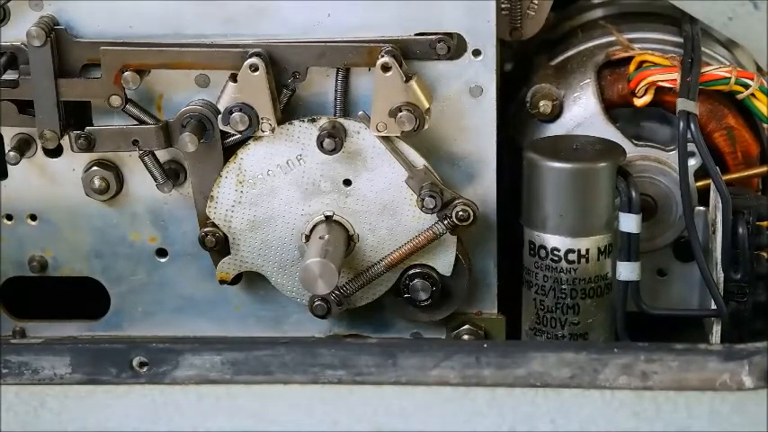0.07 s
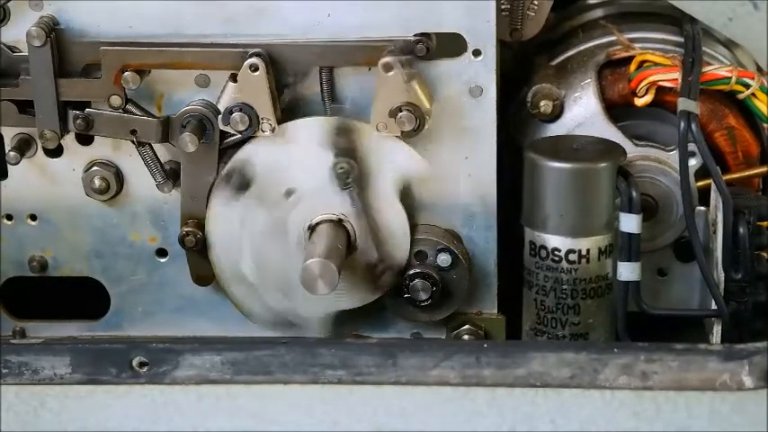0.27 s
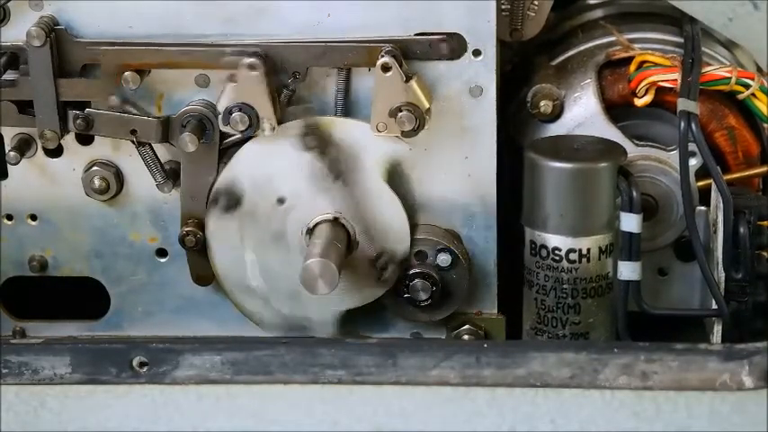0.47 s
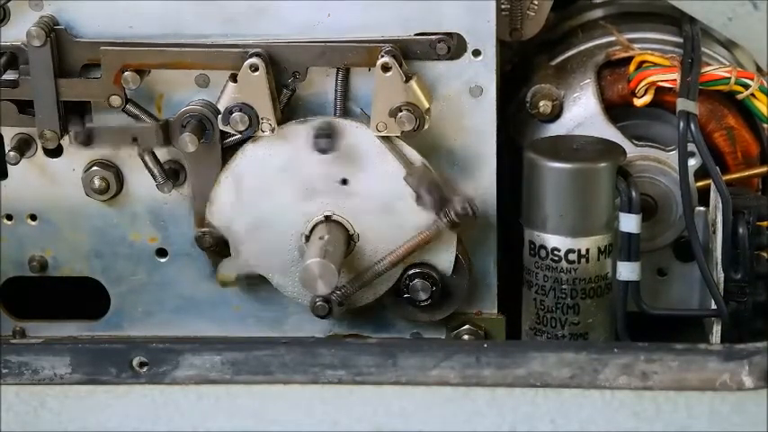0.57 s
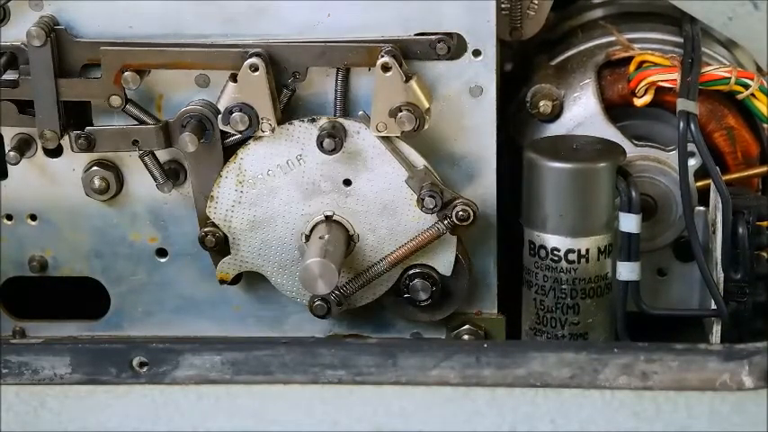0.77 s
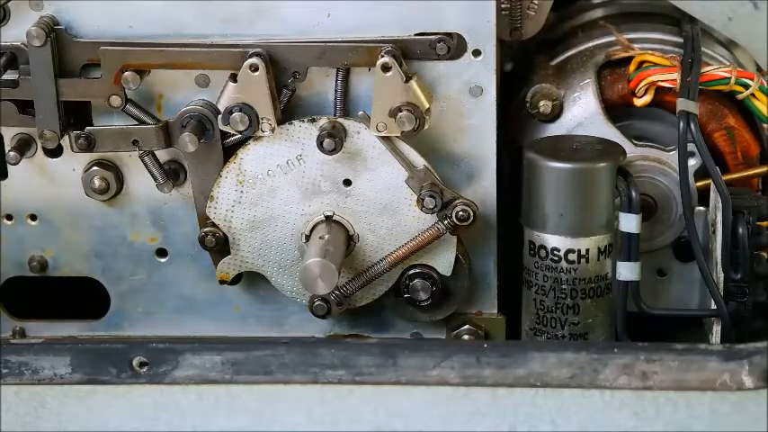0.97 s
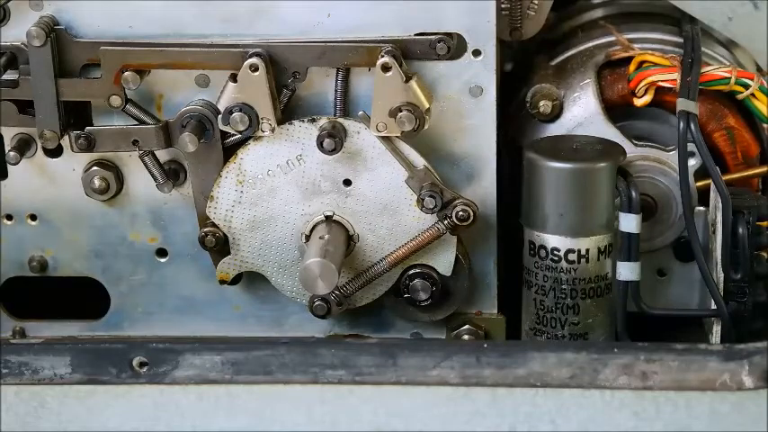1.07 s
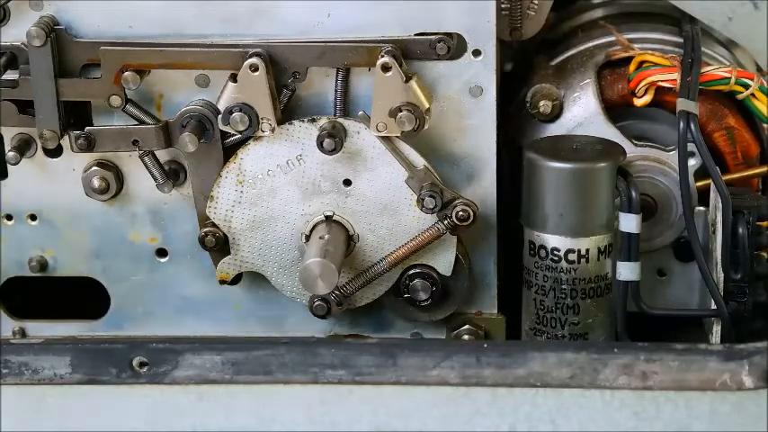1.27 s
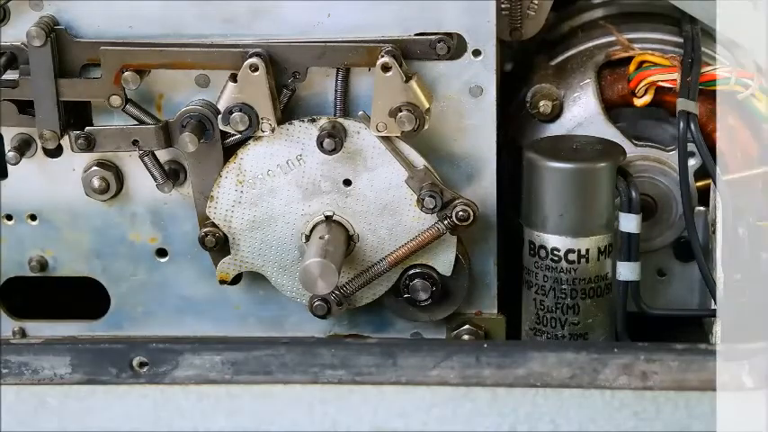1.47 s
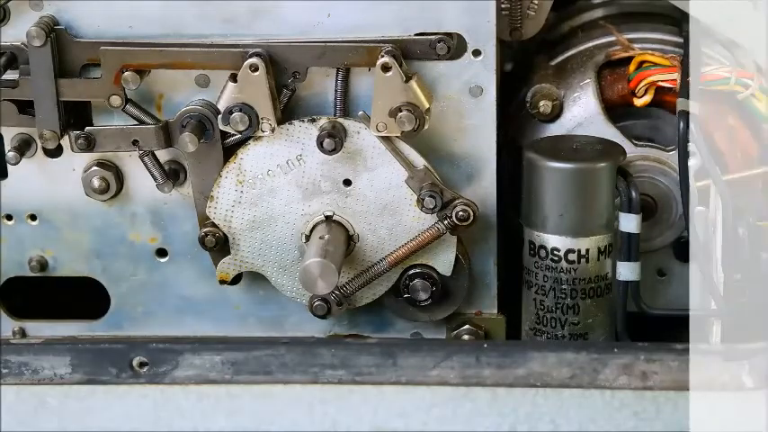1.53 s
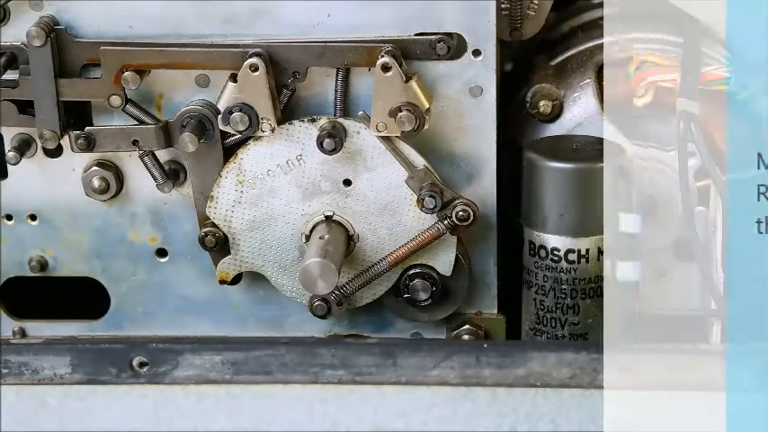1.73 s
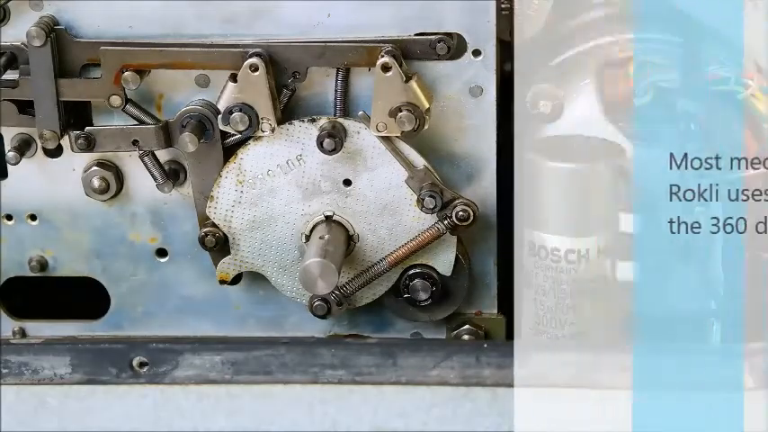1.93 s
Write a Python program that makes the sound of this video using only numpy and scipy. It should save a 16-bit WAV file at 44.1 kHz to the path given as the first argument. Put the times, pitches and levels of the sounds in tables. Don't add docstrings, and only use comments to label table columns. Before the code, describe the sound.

A motor-driven calculating mechanism clicks on, rattles harshly in two quick bursts of steel blows, stops abruptly, then only quiet room air, tiny settling ticks and a faint low thud remain, heard very close in a small room.

```python
import sys
import numpy as np
from scipy import signal
from scipy.fft import rfft, irfft, next_fast_len
from scipy.io import wavfile
from scipy.ndimage import uniform_filter1d, map_coordinates

SR = 44100
rng = np.random.default_rng(int(sys.argv[2]) if len(sys.argv) > 2 else 0)


def to_linear_factor(level_db):
    exponent = np.asarray(level_db, float) / 20
    return 10 ** exponent


def int16_out(signal):
    q = np.round(np.clip(np.atleast_2d(signal).T, -1, 1) * 32767)
    wavfile.write(sys.argv[1], SR, q.astype(np.int16))


N = 88200

# (time [s], peak level [dB], brightest pitch [Hz], decay time t60 [s])
LEVER_BLOWS = [(.1982, -6.5, 11080, 0.012), (0.2026, -7, 5490, 0.014), (0.2088, -3, 11100, 0.02),
               (0.2176, -7, 12030, 0.014), (0.2612, -13.5, 10250, .012), (.2705, -13, 12000, .02),
               (.2730, -7.5, 12140, .02), (.2750, -4, 6470, 0.023), (.2790, -1.5, 5486, 0.022),
               (0.289, -7, 5010, 0.011), (0.301, -12, 8000, 0.013), (.3060, -9, 3810, 0.015),
               (0.3144, 1.5, 12560, .008), (.3210, -4, 7990, 0.021), (0.3257, -7, 9030, .01),
               (0.3283, -3, 12500, 0.01), (0.3306, 2, 13100, 0.014), (0.339, -7.5, 13950, 0.011),
               (0.3446, 2, 6860, 0.0092), (0.3517, -9, 7510, .014), (0.3718, -10, 10990, .008),
               (0.3794, -3, 3960, .01), (0.3855, -7.5, 4506, .01), (0.39, -9, 6497, 0.012),
               (.4000, -7, 8960, .01), (0.4055, 3.5, 12240, 0.013), (0.4133, 3, 4314, 0.0091),
               (.4230, -7.5, 8285, 0.0088), (.5006, -5, 2401, 0.014), (.5105, -12.5, 2200, 0.019),
               (0.517, -11, 7000, .014), (0.5196, -5, 7350, 0.011), (0.5249, 1, 11270, 0.015),
               (0.5287, -6.5, 4000, 0.0077), (.5340, -7.5, 11040, 0.017), (0.538, -8.5, 7470, .01),
               (0.5436, 5.5, 4295, 0.0087), (0.552, -7, 7060, 0.0097), (0.56, -9, 4494, 0.0054),
               (0.5809, -5, 3185, .011), (0.6071, -10.5, 5990, 0.009), (.6140, 3.5, 4052, .011),
               (0.6227, -7.5, 4003, 0.009), (.6300, -2.5, 12500, 0.019), (0.6374, -7.5, 6500, .02),
               (0.6546, 0, 7000, 0.0091), (.6580, -0.5, 11950, 0.014), (0.6654, -11, 3003, 0.017)]
BLOW_RISE_S, BLOW_Q, BLOW_TUNED_DB, BLOW_TRIM_DB = 0.0004, 1.9, 9.5, -9
# (frequency [Hz], level [dB], t60 [s])
STEEL_MODES = [(1610, -16, 0.037), (2081, -16, 0.059), (3077, -2, 0.052), (4028, -3.5, 0.079),
               (4610, -11.5, 0.069), (6770, -4.5, 0.038), (7350, -6, 0.061), (11890, -10.5, .03),
               (13450, -7.5, 0.044)]
STEEL_DB = -22.5

# (time [s], peak level [dB])
PLATE_THUMPS = [(0.206, -31.5), (0.262, -21.5), (0.274, -19), (0.284, -14.5), (0.299, -22), (0.329, -24),
                (0.376, -25), (0.407, -23), (0.503, -20), (0.512, -17), (0.5285, -11.5), (0.543, -28.5),
                (0.582, -24), (0.601, -18.5), (0.631, -24.5), (0.666, -20)]
# (frequency [Hz], level [dB], t60 [s])
PLATE_MODES = [(689.4, 1, .05), (736, 1, 0.057), (773.6, -1.5, 0.045), (839.6, -3, 0.11), (1108, -3, 0.073),
               (1225, -7, 0.089), (1480, -9.5, 0.076)]
PLATE_TRIM_DB = -6
# (frequency [Hz], level [dB], t60 [s])
STOP_BLOW_MODES = [(845, -2.5, 0.17), (1109, -6.5, 0.18), (1186, -4, .08), (1329, -11, 0.35),
                   (705, -3.5, 0.11)]
STOP_BLOW_S, STOP_BLOW_DB = 0.664, -24

# (time [s], level [dB])
GEAR_EFFORT = [(.195, -73.5), (.199, -30), (.23, -20), (.266, -22.5), (.274, -16), (.30, -13),
               (.335, -20.5), (.36, -19.5), (.43, -20), (.495, -34.5), (.52, -10.5), (.54, -13),
               (.575, -23), (.62, -17), (.64, -16), (.675, -18), (.70, -33), (.74, -70.5)]
TEETH_PER_S, TOOTH_SPREAD_DB, TOOTH_T60_S = 2600, 1.6, 0.004
# (frequency [Hz], density [dB per Hz])
CLATTER_SPECTRUM = [(100, -63), (300, -34), (600, -20.5), (700, -8.5), (1790, -11.5), (3300, -6.5),
                    (9070, -8), (12500, -6.5)]
# (time [s], level [dB])
MOTOR_LEVEL = [(.2, -75), (.28, -43.5), (.4, -51), (.5, -52), (.56, -58), (.62, -69.5), (.69, -53.5),
               (.84, -54.5), (.92, -78)]
# (frequency [Hz], width [Hz], level [dB])
MOTOR_HUM = [(127.2, 43, -1), (144.7, 18, -8), (65, 13, -6.5)]

# (time [s], peak level [dB])
CASE_KNOCKS = [
    (.276, -34),
    (0.332, -37),
    (.407, -36.5),
    (0.527, -43),
]
# (frequency [Hz], level [dB], t60 [s])
CASE_MODES = [(122, -2.5, 0.099), (222, -4.5, 0.13), (339.6, -3, 0.066)]
# (time [s], peak level [dB])
BASE_JOLTS = [(.197, -38), (.225, -39.5), (.258, -36), (.273, -29.5), (.311, -30), (.404, -29.5),
              (.501, -38), (.518, -35), (.53, -36), (.632, -38), (.695, -39.5), (.805, -46)]
# (frequency [Hz], level [dB], t60 [s])
BASE_MODES = [(250, -4.5, 0.031), (338, -2, .06), (430.7, -2, 0.044), (510.7, -3.5, 0.056)]

# (time [s], peak level [dB])
RELAY_TICKS = [
    (0.1245, -21.5),
    (0.1262, -27),
    (0.1331, -28),
]
# (frequency [Hz], level [dB], t60 [s])
RELAY_MODES = [(2891, -13, 0.18), (3800, -8, 0.12), (4030, -3.5, 0.13), (4790, -14, .15), (6600, -10, 0.18),
               (7400, -2, .25), (7750, -3, .2), (8350, -4, .04), (10400, -7, .1), (12900, -9, .2),
               (13890, -9, .2)]
# (time [s], peak level [dB], pitch [Hz], sharpness Q [-])
SETTLING_TICKS = [
    (1.0785, -43, 2500, 1.2),
    (1.094, -51, 10000, 1.2),
    (1.1565, -33.5, 11000, .8),
    (1.172, -48, 2600, 2),
    (1.21, -52, 300, 1.5),
    (1.245, -50, 350, 1.5),
    (1.275, -50, 300, 1.5),
    (1.528, -59, 4200, 2.2),
    (1.7092, -48.5, 4050, 9),
]
# (frequency [Hz], level [dB], t60 [s])
THUD_MODES = [(149.3, -6, 0.2), (250, 0, 0.13), (352.3, -5.5, 0.16), (413.7, 1.5, 0.079), (682, -5, 0.1),
              (801, -0.5, 0.05)]
THUD_S, THUD_DB = 1.8962, -44.5

# (frequency [Hz], louder left and quieter right [dB])
LEFT_TILT = [(100, .5), (1300, 1.07), (2400, 0.23), (15000, 0)]
OPEN_HZ = 540
DEAD_HZ, DEAD_WIDTH_HZ, DEAD_DEPTH = 974, 170, 0.41
# (frequency [Hz], side over mid amplitude [-])
STEREO_WIDTH = [(400, .3), (750, .15), (1500, 0.57), (2400, 0.26), (4400, .8), (13000, 0.91)]

# (frequency [Hz], t60 [s])
ROOM_T60 = [(150, .4), (800, .75), (1300, 0.88), (4000, 0.66), (8000, 0.56), (12000, .5), (15000, .4)]
ROOM_DB = -6.5

# (time [s], level [dB])
BACKGROUND_LEVEL = [(0, -56.5), (.18, -57), (.3, -45), (.53, -52.5), (.59, -72.5), (.7, -64), (.9, -48.5),
                    (1.1, -53), (1.3, -54.5), (1.55, -63.5), (1.7, -68.5), (1.78, -59), (1.9, -54.5),
                    (2, -57)]
# (frequency [Hz], density [dB per Hz])
AIR_SPECTRUM = [(15, -34), (30, -3.5), (148, -7.5), (400, -7), (926, -14.5), (3000, -19.5), (9000, -24),
                (15000, -24.5)]
# (frequency [Hz], left-right likeness [-])
AIR_LIKENESS = [(60, 0.55), (380, 0.46), (2380, 0.11), (15000, 0.13)]
# (frequency [Hz], width [Hz], level [dB])
FIRST_HUM = [(275.1, 16, -3), (480, 8.3, -5.5), (144, 14, -7)]
# (frequency [Hz], width [Hz], level [dB])
SECOND_HUM = [(1221, 109, -8.5), (833, 52, -17.5), (290.8, 53, -7.5)]
CHANGE_S, FLUTTER_DB, FLUTTER_PER_S = 1.737, 2, 35
# (time [s], gain [dB])
ROOM_DIP = [(0, 0), (.184, 0), (.187, -25), (.1935, -25), (.195, 0), (2, 0)]

CLIP_TOP, CLIP_HARDNESS, TOP_HZ = 1.15, 18, 15950


def unit(x):
    return x / np.sqrt(np.mean(x ** 2) + 1e-20)


def along(points, hz):
    f, v = np.transpose(points)
    return np.interp(np.log(hz + 1), np.log(f + 1), v)


def level(rows):
    s, db = np.transpose(rows)
    return to_linear_factor(np.interp(np.arange(N) / SR, s, db))


def filtered(x, response):
    m = next_fast_len(x.shape[-1] + 4096)
    spectrum = rfft(x, m) * response(np.fft.rfftfreq(m, 1 / SR))
    return irfft(spectrum, m)[..., :x.shape[-1]]


def peak(f, hz, width_hz):
    return 1j * f * width_hz / (hz * hz - f * f + 1j * f * width_hz)


def band(humps):
    return lambda f: sum(to_linear_factor(db) * peak(f, hz, w) ** 2 / np.sqrt(w) for hz, w, db in humps)


def add(track, s, x):
    part = track[..., round(s * SR):][..., :x.shape[-1]]
    part += x[..., :part.shape[-1]]


def spread(pair):
    side = filtered(pair[1], lambda f: np.clip(along(STEREO_WIDTH, f), 0, 1))
    return np.array([pair[0] + side, pair[0] - side])


def ring(modes, rise_s, scatter_db, rough=0, phase=2):
    t = np.arange(SR // 4) / SR
    hz, db, t60 = np.transpose(modes)[..., None]
    luck = rng.standard_normal((len(modes), 2))
    wander = np.repeat(rng.standard_normal((len(modes), 100)), 120, axis=1)[:, :len(t)]
    drift = rough * np.sqrt(hz / hz.mean()) * np.cumsum(wander, axis=1) / 120
    decay = to_linear_factor(db + scatter_db * luck[:, :1] - 60 * t / t60)
    tones = decay * np.sin(2 * np.pi * hz * t + phase * luck[:, 1:] + drift)
    return tones.sum(0) * (1 - np.exp(-t / rise_s))


def wide_ring(*settings, **more):
    return spread(np.array([ring(*settings, **more) for _ in range(2)]))


def crack(t60, rise_s, response):
    t = np.arange(1500) / SR
    shape = to_linear_factor(-60 * (t / t60) ** 1.3) * (1 - np.exp(-t / rise_s))
    noise = spread(filtered(rng.standard_normal((2, len(t))), response))
    power = np.abs(uniform_filter1d((noise ** 2).mean(0), size=40))
    return unit(noise / np.sqrt(power + 1e-12)) * shape


def levers():
    out = np.zeros((2, N))
    for s, db, hz, t60 in LEVER_BLOWS:
        def contact(f):
            tuned = 1 + to_linear_factor(BLOW_TUNED_DB) * np.abs(peak(f, hz, hz / BLOW_Q)) ** 2
            return to_linear_factor(along(CLATTER_SPECTRUM, f)) * tuned

        add(out, s, 2 * to_linear_factor(db + BLOW_TRIM_DB) * crack(t60, BLOW_RISE_S, contact))
        add(out, s, to_linear_factor(db + STEEL_DB) * wide_ring(STEEL_MODES, 0.0001, 1.5, rough=1.5))
    return out


def plate():
    out = np.zeros((2, N))
    for s, db in PLATE_THUMPS:
        thump = wide_ring(PLATE_MODES, 0.0012, 2.8, rough=0.33, phase=0.9)
        add(out, s, to_linear_factor(db + PLATE_TRIM_DB) * thump)
    add(out, STOP_BLOW_S, to_linear_factor(STOP_BLOW_DB) * ring(STOP_BLOW_MODES, 0.002, 0, rough=0.22)[None])
    return out


def gears():
    hit = rng.random(N) < TEETH_PER_S / SR
    strength = hit * to_linear_factor(TOOTH_SPREAD_DB * rng.exponential(size=N))
    grain = to_linear_factor(-60 * np.arange(600) / SR / TOOTH_T60_S)
    swell = np.abs(signal.fftconvolve(strength, grain)[:N])
    rattle = filtered(swell * rng.standard_normal((2, N)), lambda f: to_linear_factor(along(CLATTER_SPECTRUM, f)))
    rattle = unit(spread(rattle)) * level([*GEAR_EFFORT, (0.85, -120)])
    hum = unit(filtered(rng.standard_normal(N), band(MOTOR_HUM))) * level(MOTOR_LEVEL)
    running = np.abs(np.arange(N) / SR - 0.56) < 0.37
    return (rattle + hum) * running


def case():
    out = np.zeros((2, N))
    for hits, modes in ((CASE_KNOCKS, CASE_MODES), (BASE_JOLTS, BASE_MODES)):
        for s, db in hits:
            mid = ring(modes, 0.0025, 2)
            side = 0.5 * ring(modes, 0.002, 2)
            add(out, s, to_linear_factor(db) * np.array([mid + side, mid - side]))
    return out


def relay():
    def click(f):
        return peak(f, 7100, 9700) ** 2 + 0.53 * peak(f, 800, 460)

    out = np.zeros((2, N))
    for s, db in RELAY_TICKS:
        add(out, s, to_linear_factor(db - 15.5) * wide_ring(RELAY_MODES, 0.00045, 1.8, rough=2.6))
        add(out, s, to_linear_factor(db - 5.5) * crack(0.013, 0.0005, click))
    return out


def settling_ticks():
    out = np.zeros((2, N))
    for s, db, hz, q in SETTLING_TICKS:
        add(out, s, to_linear_factor(db) * crack(0.012, 0.00022, lambda f: peak(f, hz, hz / q) ** 2))
    return out


def thud():
    out = np.zeros((2, N))
    for late_s, db in [(0, 0), (0.017, -5), (0.033, -4), (0.045, -6)]:
        add(out, THUD_S + late_s, to_linear_factor(THUD_DB + db) * ring(THUD_MODES, 0.001, 0.9, rough=0.42)[None])
    return out


def radiated(f):
    dead_band = 1 - DEAD_DEPTH * peak(f, DEAD_HZ, DEAD_WIDTH_HZ)
    return dead_band * to_linear_factor(along(LEFT_TILT, f) * np.array([[1], [-1]]))


def open_frame(f):
    return (-f * f / (OPEN_HZ ** 2 - f * f + 1.2j * f * OPEN_HZ)) ** 2


def room(x):
    hz, t, z = signal.stft(rng.standard_normal((2, SR)), SR, nperseg=256)
    decay = to_linear_factor(-60 * t / along(ROOM_T60, hz)[:, None])
    tail = spread(signal.istft(z * decay, SR, nperseg=256)[1])
    delayed = np.pad(x, ((0, 0), (250, 0)))
    return signal.fftconvolve(delayed, tail / np.linalg.norm(tail[0]), axes=1)[:, :N]


def background():
    def air(hz):
        turn = np.arccos(np.clip(along(AIR_LIKENESS, hz), -1, 1)) / 2
        return to_linear_factor(along(AIR_SPECTRUM, hz)) * [np.cos(turn), np.sin(turn)]

    mid, side = filtered(rng.standard_normal((2, N)), air)
    second = np.clip((np.arange(N) / SR - CHANGE_S) / 0.083, 0, 1)
    first_hum = unit(filtered(rng.standard_normal(N), band(FIRST_HUM)))
    second_hum = unit(filtered(rng.standard_normal(N), band(SECOND_HUM)))
    wander = map_coordinates(rng.standard_normal(200), [np.arange(N) * FLUTTER_PER_S / SR])
    flutter = to_linear_factor(FLUTTER_DB * wander)
    hums = flutter * (to_linear_factor(-8) * first_hum * (1 - second) + to_linear_factor(-3) * second_hum * second)
    return level(BACKGROUND_LEVEL) * (unit(np.array([mid + side, mid - side])) + hums)


def scene():
    machine = filtered(levers() + plate(), open_frame) + case() + gears()
    machine = filtered(machine + relay() + settling_ticks() + thud(), radiated)
    reverberation = to_linear_factor(ROOM_DB) * room(machine.mean(0)[None])
    return machine + level(ROOM_DIP) * (reverberation + background())


def roll_off(x):
    return signal.sosfilt(signal.butter(12, 15840, fs=SR, output="sos"), x)


def record(dry):
    clipped = dry / (1 + np.abs(dry / CLIP_TOP) ** CLIP_HARDNESS) ** (1 / CLIP_HARDNESS)
    mix = filtered(clipped, lambda hz: hz < TOP_HZ)
    return roll_off(mix)


dry = scene()
out = record(dry)
int16_out(out)
```